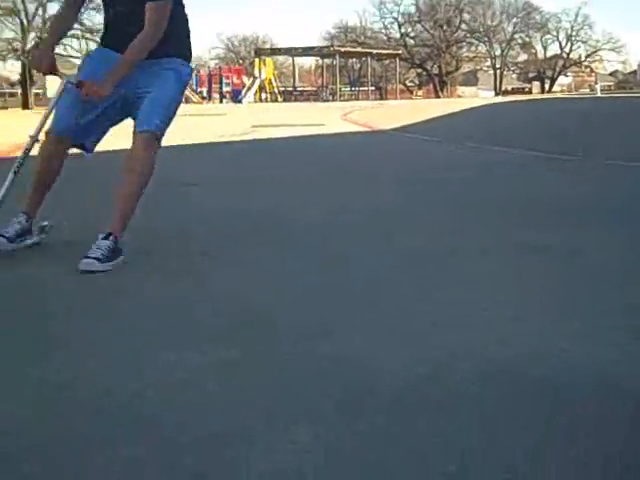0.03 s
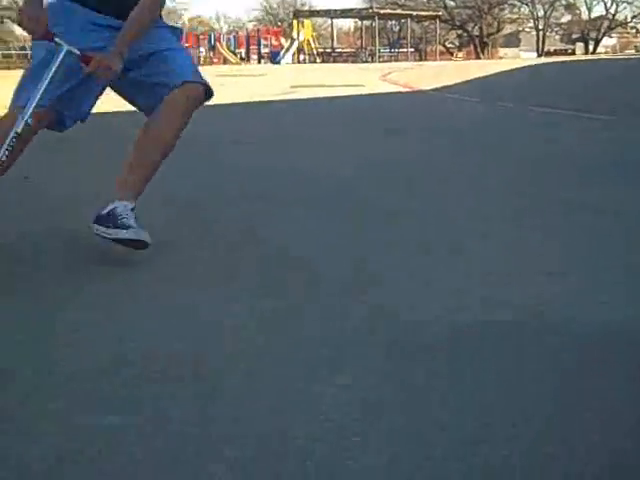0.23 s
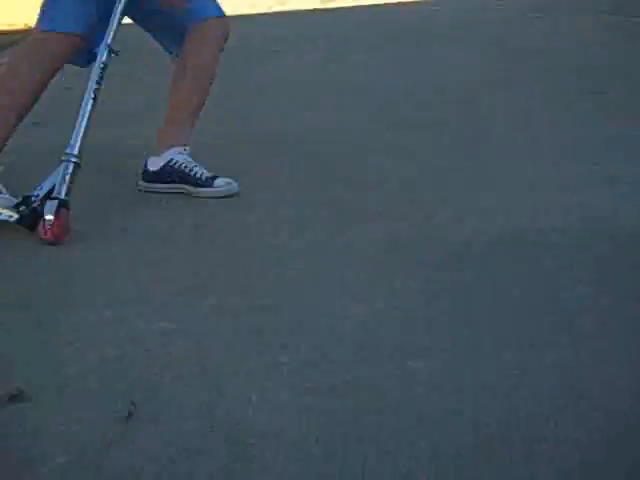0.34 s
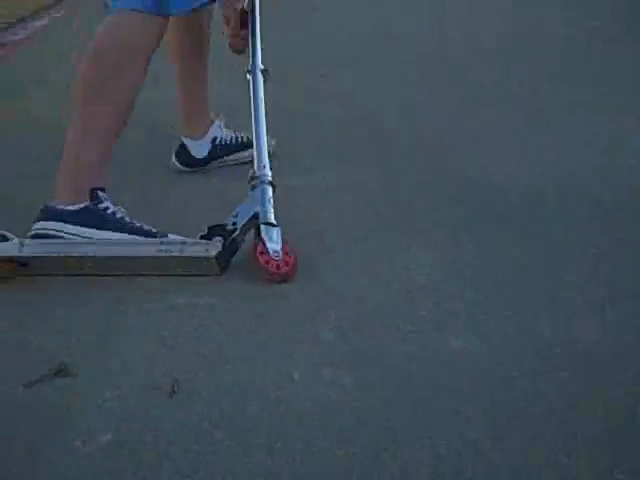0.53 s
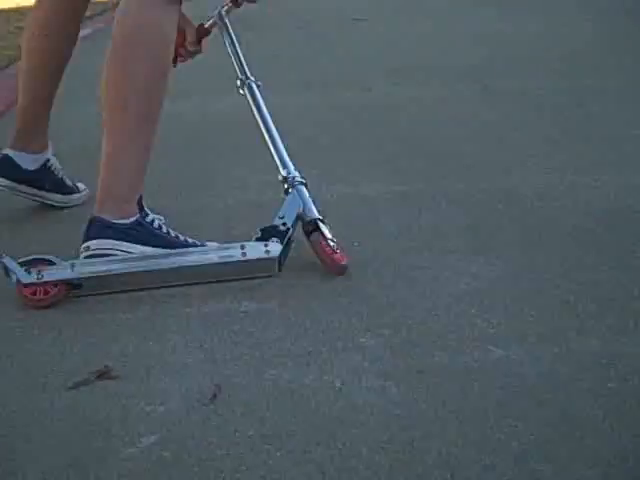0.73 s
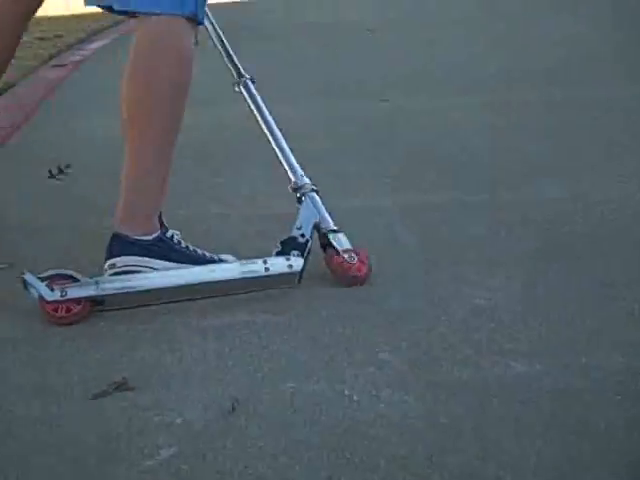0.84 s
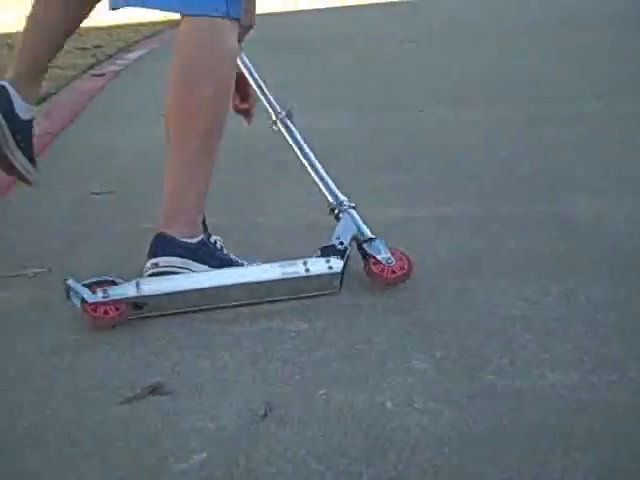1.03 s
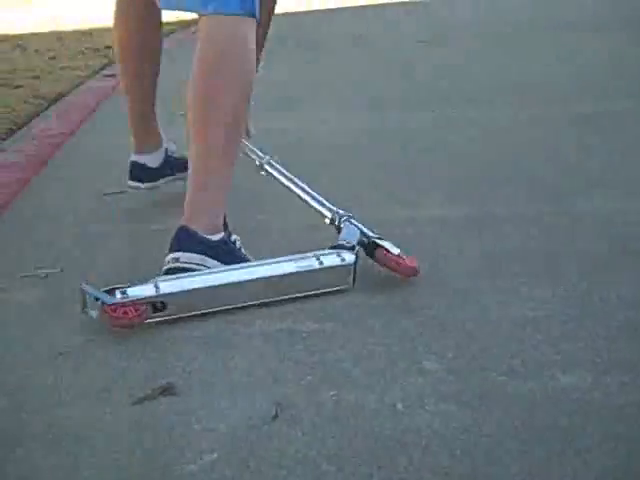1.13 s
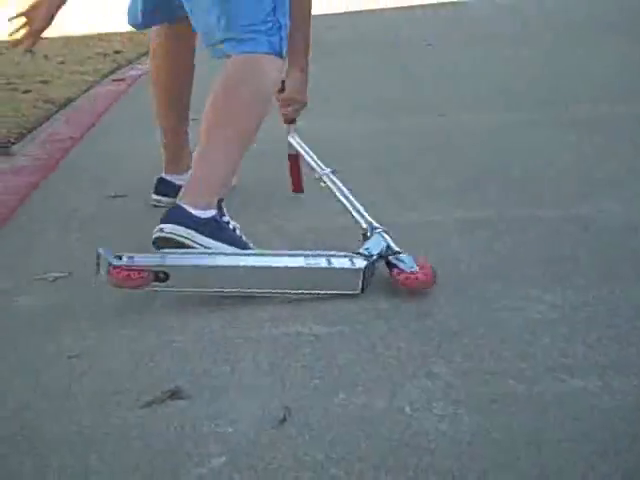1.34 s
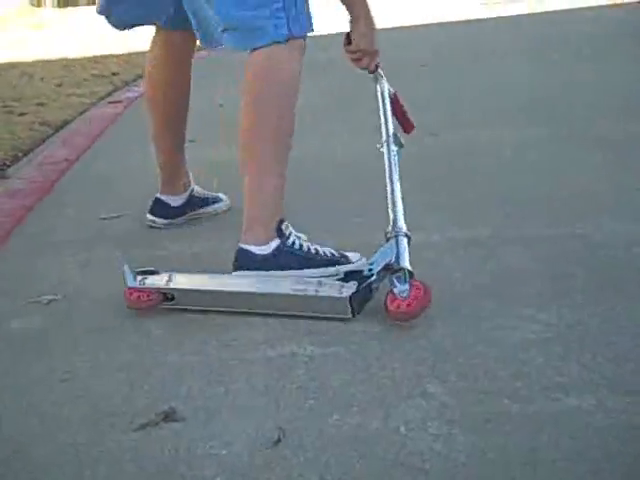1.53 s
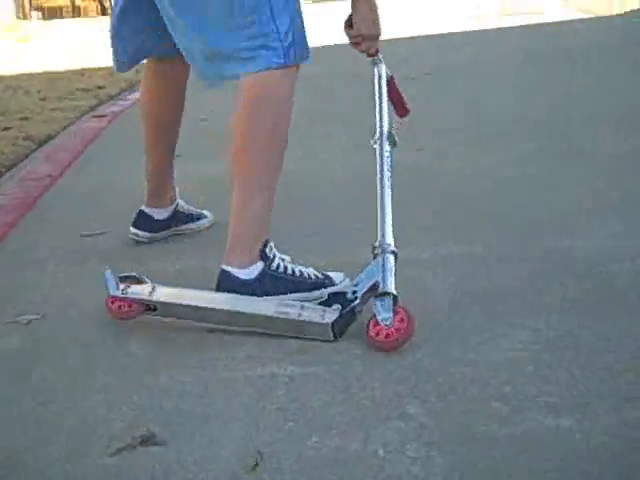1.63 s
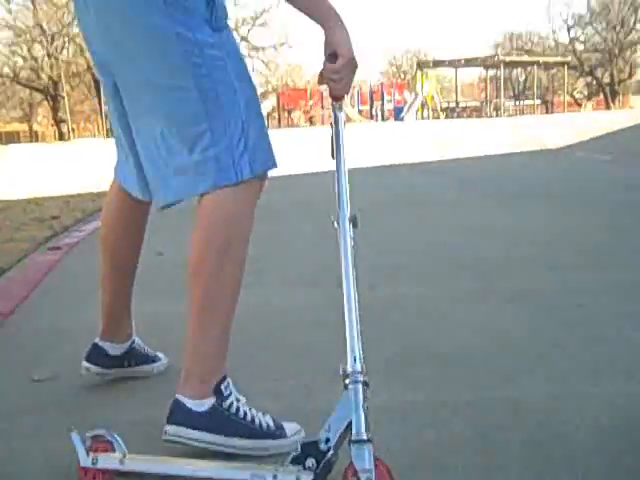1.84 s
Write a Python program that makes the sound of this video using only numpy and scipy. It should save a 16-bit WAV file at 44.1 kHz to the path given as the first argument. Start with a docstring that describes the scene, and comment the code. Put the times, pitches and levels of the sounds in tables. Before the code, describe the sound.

Kick scooter rolling gritty and rattling up close, a hard deck slam, then small loose metallic clicks

```python
"""A small metal kick scooter rolls in over rough asphalt, skids, slams its deck down and stops close by.
Then it is rocked and tipped under a shoe: wheels scuff in short strokes and the loose joint rattles.
Grinding and rattling are random clicks sent through the broad sound and the ringing of the metal frame.
Fading sine waves make thumps, cracks and puffs of air; gliding sine waves make rubber squeaks.
Early echoes and a faint outdoor noise complete the scene, heard by one microphone."""
import sys
import numpy as np
from scipy import signal
from scipy.fft import rfft, irfft
from scipy.io import wavfile

SR = 44100
rng = np.random.default_rng(int(sys.argv[2]) if len(sys.argv) > 2 else 0)


def natural_amplitude(level_db):
    """Convert a level in decibels to a linear amplitude factor, elementwise."""
    exponent = np.asarray(level_db, float) / 20
    return 10 ** exponent


def digitize_waveform(pressure):
    """Quantize a signal to 16-bit integers and store it at the path in sys.argv[1].

    Rows of a 2-D input are taken as channels; values are limited to [-1, 1].
    """
    field = np.atleast_2d(pressure).T
    bounded = np.clip(field, -1, 1)
    quanta = np.round(bounded * 32767).astype(np.int16)
    wavfile.write(sys.argv[1], SR, quanta)


N = 83790


def rms_one(x):
    """Scale to rms 1."""
    return x / np.sqrt(np.mean(x ** 2) + 1e-20)


def energy_one(x):
    """Scale to energy 1."""
    return x / np.sqrt(np.sum(x ** 2))


def colour(spectrum):
    """Filter with this spectrum that reacts as early as possible (minimum phase), energy 1."""
    hz, db = np.transpose(spectrum)
    grid = np.arange(2049) * SR / 4096 + 1
    log_size = np.interp(np.log(grid), np.log(hz), db) * np.log(10) / 20
    cepstrum = irfft(log_size)
    # folding the second half onto the first puts the sound after the click
    cepstrum[1:2048] *= 2
    cepstrum[2049:] = 0
    return energy_one(irfft(np.exp(rfft(cepstrum))))


def focus(x, hz, q, lift_db):
    """Add a resonant band around hz to the sound; a higher q makes the band narrower."""
    r = np.exp(-np.pi * hz / q / SR)
    forward = np.array([1, 0, -1]) * (1 - r * r) / 2
    feedback = [1, -2 * r * np.cos(2 * np.pi * hz / SR), r * r]
    return x + natural_amplitude(lift_db) * signal.lfilter(forward, feedback, x)


def grains(per_s, spread_db):
    """Random clicks of uneven size and sign, like many tiny contacts; rms 1."""
    sizes = natural_amplitude(spread_db * np.minimum(rng.exponential(1, N), 4)) * rng.choice([-1, 1], N)
    return rms_one(sizes * (rng.random(N) < per_s / SR))


def outdoor_air():
    """Faint distant outdoor floor: steady noise with a fixed spectrum."""
    # spectrum of the floor: (f/Hz, relative level/dB)
    air = [(30, -15.5), (80, -14), (130, -15), (220, 1.5), (450, 5.5), (900, -9), (2500, -10.5),
           (4000, -18), (8000, -26.5), (12500, -20), (15500, -29.5)]
    noise = rng.standard_normal(N + 4096)
    return natural_amplitude(-67) * signal.fftconvolve(noise, colour(air))[4096:4096 + N]


def echoes(near):
    """Ground and kerb send back weaker, later copies with softened treble."""
    # reflections: (delay/s, level before softening/dB)
    reflections = [(.004, -16.5), (.011, -23.5), (.023, -24)]
    out = np.zeros(N)
    for delay, db in reflections:
        lag = int(delay * SR)
        out[lag:] += natural_amplitude(db) * signal.lfilter([.4], [1, -.6], near)[:N - lag]
    return out


def puffs():
    """Air pushed at the microphone, and other brief low swells: low sine swings that fade away."""
    # low swings, most of them air pushed at the microphone: (start t/s, starting level/dB, f/Hz, time to fade
    # to 37 percent/s)
    pushes = [(0.51, -38, 10, .08), (0.4, -38, 47, .01), (.59, -22, 62, 0.0081), (0.32, -44.5, 120, 0.011),
              (0.87, -44, 70, 0.004)]
    out, t = np.zeros(N + SR), np.arange(SR // 2) / SR
    for s, db, hz, fade in pushes:
        swing = np.exp(-t / fade) * np.sin(2 * np.pi * hz * t)
        out[int(s * SR):][:len(t)] += natural_amplitude(db) * swing
    return out[:N]


def squeaks():
    """Rubber sticking and slipping: short gliding tones with soft ends."""
    # tones: (start t/s, length/s, level/dB, start f/Hz, end f/Hz)
    tones = [(.351, 0.018, -26, 2230, 2104), (.945, 0.064, -43, 258, 204)]
    out = np.zeros(N)
    for s, length, db, start_hz, end_hz in tones:
        u = np.arange(int(length * SR)) / (length * SR)  # 0 to 1 along the tone
        shape = np.clip(2 * np.sin(np.pi * u) ** 2, 0, 1)
        cycles = np.cumsum(start_hz + (end_hz - start_hz) * u) / SR
        out[int(s * SR):][:len(u)] += natural_amplitude(db) * shape * np.sin(2 * np.pi * cycles)
    return out


def damped_swings(hits, cycles):
    """Sine swings so heavily damped that they fall 60 dB within a few cycles."""
    out, t = np.zeros(N + SR), np.arange(4000) / SR
    for s, db, hz in hits:
        swing = natural_amplitude(db - 60 * t * hz / cycles) * np.sin(2 * np.pi * hz * t)
        out[int(s * SR):][:len(t)] -= swing
    return out[:N]


def thumps():
    """Wheels and sole thump the ground: dull, heavily damped swings."""
    # thumps: (start t/s, starting level of the swing/dB, f/Hz)
    ground_hits = [(.206, -41, 237), (.207, -14, 1200), (0.341, -33, 211), (0.475, -34, 143),
                   (0.578, -25, 297), (.59, -19.5, 142), (.64, -4.5, 365), (.652, -11, 500),
                   (.656, -13.5, 433), (0.774, -25.5, 410), (1.142, -46, 209), (1.339, -45.5, 175),
                   (1.644, -43, 360), (1.785, -45, 700), (1.873, -37.5, 329)]
    return damped_swings(ground_hits, cycles=4.8)


def cracks():
    """Grit or a hard contact cracks once: dry, heavily damped swings."""
    # cracks: (start t/s, starting level of the swing/dB, f/Hz)
    hard_hits = [(.082, -30, 5000), (.092, -25, 6000), (.118, -18, 4030), (.18, -17.5, 3540),
                 (.2, -20.5, 2571), (.342, -13.5, 3160), (.574, -14.5, 2220), (.7735, -20.5, 1490),
                 (.9655, -24, 1780), (1.0765, -25, 2000), (1.2205, -28, 7500), (1.351, -33.5, 3600),
                 (1.48, -32, 3460), (1.64, -48, 2970), (1.828, -53.5, 7000)]
    return damped_swings(hard_hits, cycles=5.8)


def ringing(modes):
    """Metal answering one click with a set of fading tones, energy 1."""
    longest_s = .035  # cap on the time to fall 60 dB
    t = np.arange(4096) / SR
    out = np.zeros(len(t))
    for k, (hz, db, t60) in enumerate(modes):
        fade = natural_amplitude(db - 60 * t / min(t60, longest_s))
        out += (-1) ** k * fade * np.sin(2 * np.pi * hz * t)
    return energy_one(out)


def scooter(low_push, high_push, ring_db):
    """Pushes on the frame sound through its broad colour and the ringing of deck and steering tube."""
    # broad colour of the frame, then of its hiss: (f/Hz, relative level/dB)
    frame = [(59, -64.5), (100, -10.5), (247, 0), (452, 6.5), (492, 4), (827, 3.5), (930, 0), (1160, 1.5),
             (3440, -0.5), (5500, -18.5), (7150, -36), (12100, -120)]
    hiss = [(2650, -9), (4500, 0.5), (5020, -3), (5870, -2.5), (6380, -2.5), (9640, -2), (11700, -11),
            (14000, -9.5), (15600, -20.5)]
    # ringing tones of deck and steering tube: (f/Hz, relative level/dB, time to fall 60 dB before a cap/s)
    low_modes = [(794, 14.5, 0.0091), (1130, 16, 0.057), (1395, 12, 0.075), (1402, 10, 0.043),
                 (2240, -25, .02), (2550, 3, 0.06), (3330, 10, 0.075), (3477, 11.5, 0.02), (3600, 0, 0.055),
                 (3795, 13, 0.013)]
    high_modes = [(6060, -4, 0.06), (6390, 2.5, 0.014), (7440, -5.5, 0.045), (8310, 4, 0.018),
                  (9330, -1, .02), (10475, 10, 0.0089)]
    out = 0
    for push, spectrum, modes in ((low_push, frame, low_modes), (high_push, hiss, high_modes)):
        body = energy_one(colour(spectrum) + natural_amplitude(ring_db) * ringing(modes))
        out = out + signal.fftconvolve(push, body)[:N]
    return out


def rattling():
    """Each jolt of the loose joint and deck is a tick and a dying chatter of metal contacts."""
    # jolts: (t/s, level before trims/dB, relative treble before trim/dB, time to fall 60 dB/s, favoured f/Hz)
    jolts = [(0.004, -26, -20, 0.05, 2500), (0.064, -14.5, -5.5, 0.031, 3840),
             (0.079, -32, -19, 0.04, 1180), (0.089, -21, -7, 0.07, 1120), (0.119, -13, -5, 0.021, 2720),
             (0.172, -17, -6, 0.092, 1680), (0.196, -14.5, -17, 0.064, 2550),
             (0.205, -5.5, -28, 0.046, 1320), (0.219, -25, -22, 0.05, 2570), (0.252, -16, 1.5, 0.041, 2460),
             (0.261, -16, -18, 0.028, 3720), (0.34, -20.5, 0.5, 0.05, 2160), (0.419, -12, -14, 0.064, 3210),
             (0.451, -14, -6, 0.11, 2100), (0.536, -8.5, -29, 0.14, 1390), (0.579, 4.5, -15, 0.064, 2680),
             (0.583, -1.5, -36, 0.035, 1820), (0.59, -9, 1, 0.062, 3670), (0.607, -8, -6.5, 0.12, 3770),
             (0.638, 0.5, -5, 0.017, 1020), (0.649, -4.5, -9.5, 0.13, 800),
             (0.686, -11.5, -12, 0.017, 1460), (0.701, -9, -8, 0.061, 3720), (0.721, -17, 0, 0.017, 3410),
             (0.762, -34, -2, 0.032, 3470), (0.774, -20, -1, 0.026, 3540), (0.787, -18, -2, 0.025, 3370),
             (0.801, -16.5, -7, 0.054, 3230), (0.824, -28, 2.5, 0.037, 3580), (0.832, -36, 1, 0.05, 3440),
             (0.864, -19, -4, 0.048, 3120), (0.888, -17, -6.5, 0.12, 790),
             (0.903, -20.5, -1.5, 0.067, 3330), (0.915, -36.5, -5, 0.055, 3550),
             (0.956, -26, -13.5, 0.05, 1320), (0.963, -17, -11, 0.025, 1130),
             (1.066, -23.5, -26, 0.059, 2000), (1.075, -55, -18, 0.042, 2080),
             (1.143, -22.5, 0.5, 0.021, 3120), (1.173, -20.5, -6, 0.024, 3380),
             (1.201, -28, -7, 0.035, 2800), (1.214, -28.5, 2, 0.033, 1180), (1.221, -37, 5, 0.056, 1260),
             (1.257, -25, -7, 0.039, 1260), (1.263, -22.5, 1, 0.049, 1130),
             (1.269, -23, -16.5, 0.057, 1370), (1.279, -16.5, -4, 0.025, 1340),
             (1.328, -36.5, -12.5, 0.037, 3560), (1.339, -23, -5, 0.037, 3610),
             (1.348, -27, -45, 0.078, 3640), (1.369, -22, -32.5, 0.09, 1250),
             (1.374, -21, -13, 0.052, 3220), (1.384, -46.5, -24.5, 0.045, 1460),
             (1.427, -28, -14, 0.15, 3330), (1.454, -26.5, -15, 0.14, 1080),
             (1.485, -26.5, -14.5, 0.075, 3400), (1.487, -43.5, -16.5, 0.045, 3400),
             (1.499, -29, -21, 0.12, 3180), (1.541, -37.5, -29.5, 0.12, 713),
             (1.594, -35, -22.5, 0.032, 1400), (1.647, -25.5, -22, 0.091, 2070),
             (1.662, -25.5, -18, 0.022, 3420), (1.717, -34.5, -19.5, 0.035, 1495),
             (1.786, -34, -34.5, 0.052, 740), (1.796, -46, -36, 0.053, 703),
             (1.871, -25, -30.5, 0.05, 2140), (1.876, -15, -18.5, 0.022, 2200),
             (1.883, -50, -31.5, 0.045, 1440)]
    trim_db, treble_trim_db = -19, 10
    tick_db = 18.5 + np.array([0, -13])  # first tick: frame, treble
    t = np.arange(6000) / SR
    chatter = [grains(6000, spread_db=2.5) for _ in range(2)]
    chatter = np.pad(chatter, ((0, 0), (0, len(t))))
    pushes = np.zeros((2, N + len(t)))
    for s, db, treble_db, t60, hz in jolts:
        i = int(s * SR)
        level_db = db + trim_db
        burst = natural_amplitude(level_db - 60 * t / max(t60, .005)) * chatter[:, i:i + len(t)]
        burst[:, 0] = natural_amplitude(level_db + tick_db)
        low = focus(burst[0], hz, q=6.15, lift_db=9)
        high = burst[1] * natural_amplitude(treble_db + treble_trim_db)
        pushes[:, i:i + len(t)] += [low, high]
    thin = signal.butter(1, [500, 12000], "band", fs=SR, output="sos")
    return signal.sosfilt(thin, scooter(*pushes[:, :N], ring_db=-1))


def grind_focus(x, hz):
    """Grinding favours the frame near one pitch."""
    return focus(x, hz, q=3.15, lift_db=3)


def scuffing(grit, fine):
    """Wheels and sole scuff in short strokes of grit while the scooter is rocked; frame and hiss pushes."""
    # strokes: (start t/s, length/s, level before trim/dB, relative hiss level/dB, favoured frame f/Hz)
    strokes = [(0.751, 0.017, -55.5, 0, 3500), (.772, 0.062, -39, -7, 1480),
               (0.846, 0.08, -38.5, -4.5, 1850), (0.941, 0.056, -42, -9, 1190),
               (0.992, 0.035, -52, -18, 1480), (1.058, 0.016, -44, -17, 1930),
               (1.106, 0.013, -45, -4, 1540), (1.132, 0.049, -46, -3, 1850),
               (1.209, 0.077, -43.5, -6.5, 1400), (1.286, 0.048, -68.5, 1, 1190),
               (1.324, 0.073, -51, -9, 2700), (1.396, .15, -53, -13, 1390),
               (1.588, 0.029, -52, -12.5, 1130), (1.641, 0.06, -50.5, -19, 1445),
               (1.71, 0.015, -49, -18.5, 1550), (1.783, 0.02, -57.5, -21, 1000),
               (1.827, 0.021, -60.5, -21, 970), (1.867, 0.027, -44, -14.5, 2040)]
    rise_s, fall_s = 0.004, 0.046  # fall: time to drop 60 dB
    low, high, t = np.zeros(N), np.zeros(N), np.arange(N) / SR
    for s, length, db, hiss_db, hz in strokes:
        i = slice(int(s * SR), int(s * SR) + 12000)
        rise = np.clip((t[i] - s) / rise_s, 0, 1)
        shape = rise * natural_amplitude(db - 60 * np.maximum(t[i] - s - length, 0) / fall_s)
        low[i] += natural_amplitude(-4.5) * grind_focus(grit[i] * shape, hz)
        high[i] += fine[i] * shape * natural_amplitude(hiss_db)
    return low, high


def rolling(grit, fine):
    """Wheels grind on grit while rolling in, and the skidding tyre whooshes; frame and hiss pushes."""
    # course of the rolling: (t/s, level before trims/dB, relative hiss level/dB, favoured frame f/Hz)
    course = [(0, -38.5, -1, 2310), (.05, -42, -6, 2100), (.13, -41, 0, 2100), (.17, -34.5, -3, 2450),
              (.24, -33.5, -0.5, 2070), (.3, -37, 1, 2070), (.33, -30, -5, 2700), (.38, -38, 3, 2240),
              (.42, -29, -4, 1400), (.47, -30.5, 1.5, 1200), (.52, -28, -1.5, 1160),
              (.572, -22.5, -6.5, 1206), (.6, -13, -13.5, 2650), (.618, -17.5, -12, 990),
              (.64, -21.5, -7.5, 750), (.67, -23.5, -8, 800), (.695, -24.5, -8, 1220),
              (.724, -28.5, -11.5, 1300), (.731, -52.5, 6, 2000), (.76, -56.5, 6, 2000),
              (.8, -84.5, 4, 2000)]
    skid_s, skid_length_s, skid_hz = 0.477, 0.037, 5940
    t = np.arange(N) / SR
    times, *columns = np.transpose(course)
    level_db, hiss_db, centre_hz = [np.interp(t, times, column) for column in columns]

    # blend neighbouring fixed pitches to move the favoured one
    pitches = np.geomspace(700, 3700, 6)
    place = np.interp(np.log(centre_hz), np.log(pitches), np.arange(6))
    low = 0
    for k, hz in enumerate(pitches):
        low = low + np.clip(1 - abs(place - k), 0, 1) * grind_focus(grit, hz)
    low = natural_amplitude(level_db - 5.5) * low
    # rolling fast drives little of the frame's bass
    thin = signal.butter(2, 859, "high", fs=SR, output="sos")
    low = natural_amplitude(-5) * low + signal.sosfilt(thin, low)

    high = fine * natural_amplitude(level_db + hiss_db)
    skid = np.exp(-((t - skid_s) / skid_length_s) ** 2)
    high += (focus(high, skid_hz, q=8.6, lift_db=2) - high) * skid
    return low, high


def grinding():
    """Grit under the wheels: dense grains of flickering strength, first rolling, then in strokes."""
    flicker_db, flicker_hz = 1.2, 150  # rms depth; corner of each of two equal smoothing stages
    r = np.exp(-2 * np.pi * flicker_hz / SR)
    wander = signal.lfilter([1], [1, -2 * r, r * r], rng.standard_normal(N))
    flicker = natural_amplitude(flicker_db * rms_one(wander))
    grit, fine = [grains(5000, spread_db=3.5) * flicker for _ in range(2)]
    roll_low, roll_high = rolling(grit, fine)
    scuff_low, scuff_high = scuffing(grit, fine)
    return scooter(roll_low + scuff_low, roll_high + scuff_high, ring_db=-25.5)


def scene():
    """Scooter with a few early echoes over the outdoor floor."""
    sources = grinding() + rattling() + thumps() + cracks() + squeaks()
    mic_cut = signal.butter(3, 106, "high", fs=SR, output="sos")
    near = signal.sosfilt(mic_cut, sources)
    out = near + puffs() + outdoor_air() + echoes(near)
    return out[None]


def top_cut(x):
    """Nothing passes above the cut-off."""
    return signal.sosfilt(signal.butter(12, 15800, fs=SR, output="sos"), x)


def record(dry):
    """Add the small steady offset of the recorder and finish the mix."""
    mix = dry + natural_amplitude(-68)
    return top_cut(mix)


dry = scene()
out = record(dry)
digitize_waveform(out)
```